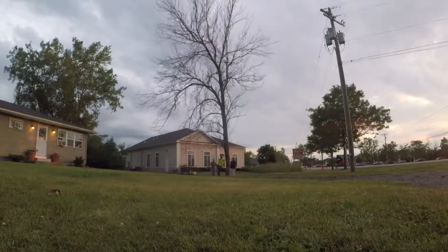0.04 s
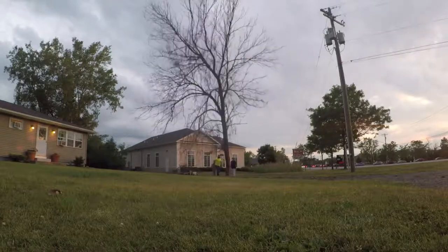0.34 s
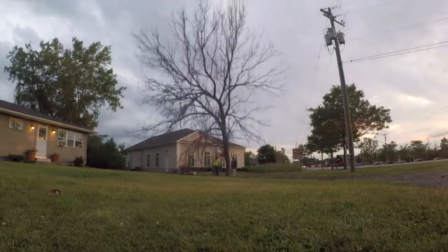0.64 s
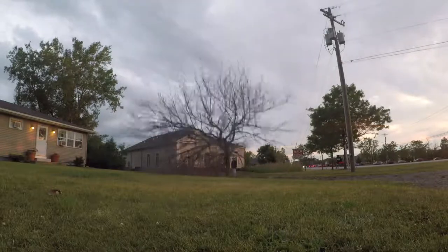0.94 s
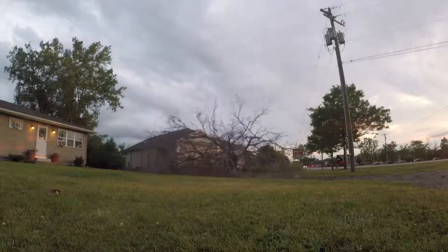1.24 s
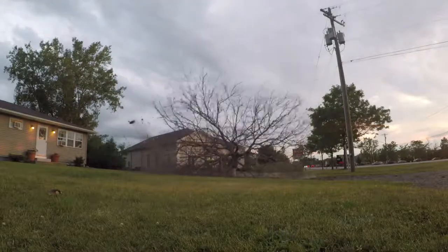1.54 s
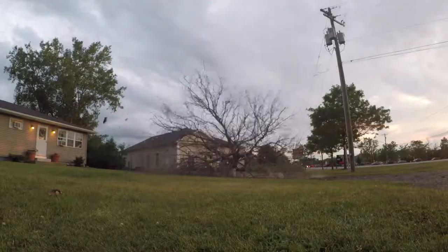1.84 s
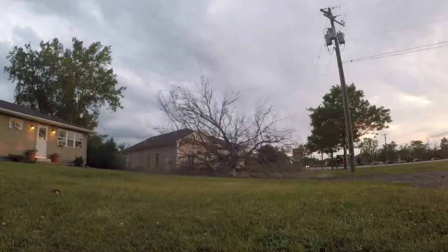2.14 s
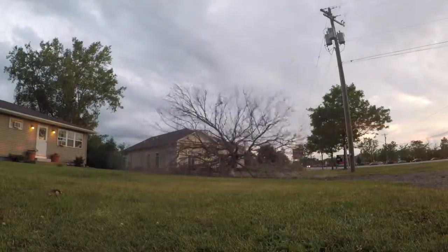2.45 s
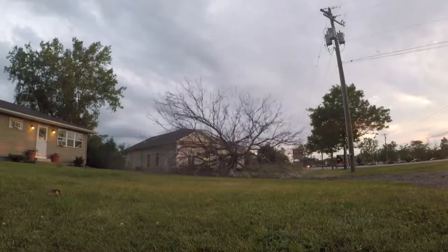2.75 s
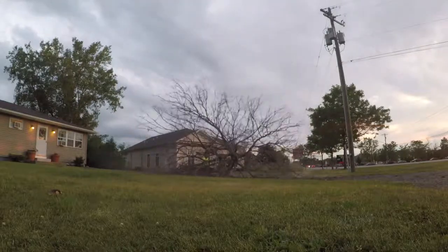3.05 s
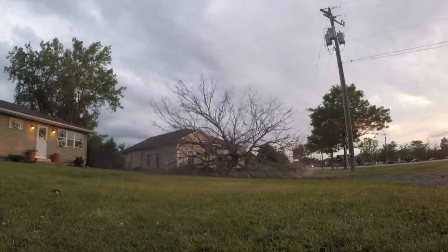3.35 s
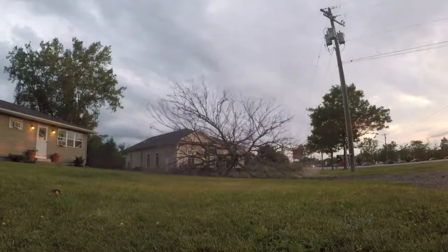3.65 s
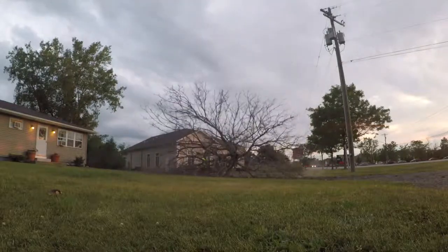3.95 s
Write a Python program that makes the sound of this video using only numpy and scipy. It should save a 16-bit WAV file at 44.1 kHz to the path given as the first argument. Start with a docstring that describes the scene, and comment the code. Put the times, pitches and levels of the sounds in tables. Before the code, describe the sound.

A tree falls some way off, starting with a dull rush and two hollow wooden knocks around 0.5 seconds. Snapping twigs and branches swell into a crash, limbs thudding from 0.8 and the trunk landing at about 1 second. The tree rocks and settles with another rush after 2 seconds, then thinning snaps and debris ticks until 4. A low engine drone and rumble run beneath, strongest before the landing.

```python
"""A bare tree is felled across a lawn, some way off, its crown landing in a rush of breaking twigs.
Branches snap in quick runs of fractures, thick wood knocks, limbs and trunk thud onto the turf.
The tree rocks and settles with a dull rush and scattered snaps; debris ticks nearby.
An engine drones and rumbles beneath. Two closely spaced microphone ports in the grass hear it all."""
import sys
import numpy as np
from scipy import signal
from scipy.fft import rfft, irfft
from scipy.io import wavfile

SR = 44100
rng = np.random.default_rng(int(sys.argv[2]) if len(sys.argv) > 2 else 0)


def master_out(mix):
    """Clip the mix to full scale and print it as 16-bit PCM to the path in sys.argv[1]."""
    frames = np.transpose(np.atleast_2d(mix))
    ceiling = np.clip(frames, -1, 1)
    pcm = np.round(ceiling * 32767).astype(np.int16)
    wavfile.write(sys.argv[1], SR, pcm)


N = 176400
T = np.arange(N) / SR
HZ = np.maximum(np.arange(N + 1) * SR / (2 * N), 1)

# how hard the twigs are crushed (time [s], level [dB])
CRUSH_LEVEL = [(0, -48.5), (.48, -45.5), (.565, -41.5), (.585, -34), (.69, -27.5), (.82, -24.5),
               (1.02, -24), (1.035, -31), (1.09, -28.5), (1.118, -23.5), (1.145, -27), (1.25, -29),
               (1.42, -33.5), (1.99, -36), (2.025, -30.5), (2.35, -35), (2.82, -40), (2.9, -36.5),
               (3.05, -35.5), (3.1, -42), (3.3, -47), (4, -47.5)]
# twig spectrum in the crash (frequency [Hz], gain [dB])
CRASH_EQ = [(300, 11), (900, -7), (1400, -6), (2100, 1.5), (2900, -1), (4000, 1.5), (5500, 2), (7800, -8),
            (10000, -12.5), (14000, -26.5)]
# twig spectrum while settling (frequency [Hz], gain [dB])
SETTLE_EQ = [(300, 9), (900, -5), (1400, -5.5), (2100, 1), (2900, -3.5), (4000, -1.5), (5800, -1.5),
             (7800, -11.5), (10000, -13.5), (14000, -32.5)]
# branch snaps (time [s], relative peak [dB], pitch [Hz])
SNAPS = [(.516, -22.5, 4490), (.573, -20, 4700), (0.633, -12, 4480), (0.661, -13.5, 4270),
         (.691, -12, 4850), (0.719, -10, 4880), (.737, -23, 5000), (.773, -15, 4600), (.798, -6.5, 4630),
         (0.825, -7.5, 5360), (0.859, -10.5, 4400), (.896, -10, 3360), (.94, -13, 4700), (.951, -14, 3240),
         (.973, -12, 4000), (0.993, -20, 4000), (1.024, -17, 3600), (1.108, -16, 3380),
         (1.123, -11.5, 3980), (1.166, -9.5, 4680), (1.186, -17.5, 3930), (1.247, -12, 4600),
         (1.485, -15, 5050), (1.738, -18, 8600), (1.781, -24.5, 2760), (1.834, -24, 9500),
         (2.027, -17.5, 2360), (2.088, -15, 5870), (2.207, -19, 9400), (2.21, -7.5, 4510),
         (2.252, -16, 5430), (2.413, -18.5, 6200), (2.439, -18, 4000), (2.611, -21, 4700),
         (2.622, -18, 2700), (2.718, -18.5, 2160), (2.741, -19.5, 5080), (2.754, -25, 10500),
         (3.171, -21.5, 3320), (3.195, -23, 3560), (3.456, -29, 2300), (3.48, -22.5, 2500),
         (3.556, -29, 2780), (3.642, -23.5, 3900), (3.712, -19.5, 4370), (3.881, -24.5, 3530),
         (3.939, -18.5, 4100), (3.98, -28, 4180)]
# hollow knocks of thick wood (time [s], level [dB], pitch [Hz])
KNOCKS = [(.392, -16.5, 292), (.522, -14, 364.6), (1.471, -21.5, 460)]
# debris ticks (time [s], relative level [dB])
TICKS = [(.04, -28.5), (.158, -30.5), (.174, -30.5), (.283, -30), (.39, -31), (1.724, -26), (1.736, -28),
         (2.166, -28), (2.754, -26), (2.87, -24), (3.049, -29), (3.241, -29), (3.637, -30), (3.835, -27)]
# tick spectrum (frequency [Hz], gain [dB])
TICK_EQ = [(800, 4), (2500, 17), (6000, 17), (12000, 1), (15000, -17)]
# limb landings (time [s], relative level [dB])
LIMB_HITS = [(.80, -18), (.845, -11), (.918, -11), (.985, -13), (1.06, -17.5), (1.105, -20.5), (1.147, -17),
             (1.49, -19)]
# limb thud spectrum (frequency [Hz], gain [dB])
LIMB_EQ = [(25, -22), (75, -9), (140, 1.5), (300, -6), (600, -11), (1000, -30.5), (2500, -55)]
# trunk landing (time [s], level [dB])
TRUNK_HIT = [(1.021, -11)]
# trunk slam spectrum (frequency [Hz], gain [dB])
TRUNK_EQ = [(120, -18), (280, 6.5), (600, 2.5), (1100, -8.5), (2200, -7.5), (5000, -14), (10000, -52)]
# rush of the moving tree (time [s], level [dB])
RUSH_LEVEL = [(0, -24), (.17, -25), (.42, -30), (.62, -26.5), (.85, -23), (1.02, -32), (1.25, -30),
              (1.5, -32.5), (1.85, -32.5), (2.1, -27.5), (2.8, -32.5), (3.3, -42), (4, -35.5)]
# rush, lower band (frequency [Hz], gain [dB])
RUSH_LOW_EQ = [(150, -22.5), (260, -2), (380, -3.5), (540, -3), (720, -14.5), (1100, -29), (3000, -71)]
# rush, upper band (frequency [Hz], gain [dB])
RUSH_TOP_EQ = [(350, -20.5), (650, 7.5), (800, -4), (1100, -12.5), (1600, -43), (4000, -61)]
# engine note (time [s], pitch [Hz], relative level [dB])
ENGINE_NOTE = [(0, 56.6, -18.5), (.35, 55.45, -18.5), (.6, 55.3, -14.5), (.8, 53.75, -19), (.9, 54.9, -20),
               (1.25, 54, -44), (2.6, 57.14, -31), (4, 56.8, -29.5)]
# engine harmonics (order [-], gain [dB])
ENGINE_ORDERS = [(1, 2), (2, -9), (3, -14.5)]
# background rumble (time [s], level [dB])
RUMBLE_LEVEL = [(0, -18.5), (.7, -18), (1, -15.5), (1.25, -24.5), (1.6, -23), (1.95, -22.5), (2.25, -18.5),
                (2.8, -17), (3.4, -17.5), (4, -18)]
# rumble and hiss spectrum (frequency [Hz], gain [dB])
RUMBLE_EQ = [(15, -6.5), (32, -2.5), (65, 3), (85, -3.5), (108, -0.5), (150, -6), (220, -10.5),
             (330, -14.5), (450, -18.5), (620, -21), (900, -30), (1500, -37), (3000, -49.5), (5500, -52),
             (8000, -66), (11000, -72), (15000, -84)]
# left port against right (frequency [Hz], level [dB], phase lead [rad], coherence [0-1])
PORT_RESPONSE = [(100, -2.4, -.02, 1), (250, -4, -.15, .999), (400, -8, -.35, .99), (510, -14, -.4, .97),
                 (600, -24, .5, .5), (660, -17, 2.5, .93), (800, -7.8, 2.45, .98), (1050, -4.5, 2.35, .97),
                 (1550, -5.5, 1.7, .83), (2350, 1.5, 0, .86), (2900, -3.5, -.4, .82), (3500, -.5, .1, .96),
                 (4800, 1.8, .2, .88), (5600, -2, .1, .5), (6700, .5, 1.8, .5), (7900, 7, 1.8, .45),
                 (9500, -.5, .3, .25), (14000, 0, 0, .25)]


def twigs(ref_per_s=1250, ref_db=-24.5, tail_t60_s=0.072, tail_db=2.5, rustle_db=-5.5):
    """Twigs break in bunches over a smooth rustle; harder crushing is louder and denser."""
    crush_db, = in_time(CRUSH_LEVEL)
    breaks_per_s = ref_per_s * from_db(0.24 * (crush_db - ref_db))
    chance = breaks_per_s / SR
    size_db = 4 * np.minimum(rng.exponential(1, N), 3)
    sizes = rms_one(from_db(size_db)) * rng.choice([-1, 1], N)
    bunches = rms_one(from_db(0.5 * drift(per_s=25)))
    onsets = np.flatnonzero(rng.random(N) < chance)
    pitch_hz = rng.uniform(1000, 16000, N)
    strength = bunches * sizes / np.sqrt(chance)
    grit, crackle = noise(), np.zeros((2, N))
    for i in onsets:
        twig = fracture(pitch_hz[i], grit[:, i % (N - 1024):], t60_cycles=28, grit_gain=0.6)
        add(crackle, i / SR, strength[i] * twig)
    # each break also bounces through the crown
    power_decay = from_db(-120 / (tail_t60_s * SR))
    tail_power = signal.lfilter([1 - power_decay], [1, -power_decay], crackle ** 2 + 1e-18)
    tail = from_db(tail_db) * noise() * np.sqrt(tail_power)
    flat = from_db(crush_db) * (crackle + tail + from_db(rustle_db) * noise())
    settled = np.interp(T, [1.4, 1.44], [0, 1])
    return (1 - settled) * coloured(flat, CRASH_EQ) + settled * coloured(flat, SETTLE_EQ)


def fracture(hz, grit, t60_cycles, grit_gain):
    """One break in wood: a short ring plus a noisy crack, unit energy."""
    t = T[:512]
    ring = np.sin(2 * np.pi * hz * t * [[1], [1.1]])
    crack = (ring + grit_gain * grit[:, :len(t)]) * from_db(-60 * t * hz / t60_cycles)
    return crack / np.sqrt(np.sum(crack ** 2, axis=1, keepdims=True))


def snaps(gain_db=2.5, step_db=3.5, gap_cycles=4.25, log_pitch_spread=0.26):
    """A branch gives way in six fractures, the third strongest; thicker ones are slower and duller."""
    out = np.zeros((2, N))
    for time_s, db, hz in SNAPS:
        lowpass = signal.butter(2, min(1.38 * hz, SR / 2.5), fs=SR, output="sos")
        for k in range(-2, 4):
            pitch_hz = hz * np.exp(log_pitch_spread * (k != 0) * rng.uniform(-1, 1))
            crack = fracture(pitch_hz, rng.standard_normal((2, 512)), t60_cycles=11, grit_gain=0.62)
            crack = signal.sosfilt(lowpass, crack)
            lag_s = gap_cycles / hz * (k + rng.uniform(-0.5, 0.5))
            peak = from_db(db + gain_db - step_db * abs(k))
            add(out, time_s + lag_s, peak * crack / np.abs(crack).max())
    return out


def knocks(t60_s=0.12):
    """A strained trunk or struck limb rings briefly in two low modes."""
    out, t = np.zeros((2, N)), T[:SR // 4]
    for time_s, db, hz in KNOCKS:
        ring = np.sin(2 * np.pi * hz * t) + 0.2 * np.sin(2 * np.pi * 1.2 * hz * t)
        add(out, time_s, (ring * from_db(db - 60 * t / t60_s))[None])
    return out


def thuds(limb_gain_db=-5):
    """Heavy limbs land on the turf; the trunk slams down with a broad woody crack."""
    limbs = from_db(limb_gain_db) * coloured(bursts(LIMB_HITS, t60_s=0.39), LIMB_EQ)
    trunk = coloured(bursts(TRUNK_HIT, t60_s=0.057), TRUNK_EQ)
    return limbs + trunk


def rush(ref_db=-27, top_at_ref_db=-34.5, top_db_per_db=2.22):
    """Hollow rush as the trunk tips, lands and rocks back; brighter as it swells."""
    low_db, = in_time(RUSH_LEVEL)
    top_db = top_at_ref_db + top_db_per_db * (low_db - ref_db)
    low = from_db(low_db) * coloured(noise(), RUSH_LOW_EQ)
    top = from_db(top_db) * coloured(noise(), RUSH_TOP_EQ)
    return low + top


def ticks(gain_db=-2.5):
    """Bits of debris tick brightly near the microphone."""
    return from_db(gain_db) * coloured(bursts(TICKS, t60_s=0.026), TICK_EQ)


def engine(waver_hz=0.7, waver_db=1.3):
    """Wavering drone of three harmonics, loudest until the tree lands."""
    hz, db = in_time(ENGINE_NOTE)
    phase = 2 * np.pi * np.cumsum(hz + waver_hz * drift(per_s=12)) / SR
    out = np.zeros(N)
    for order, order_db in ENGINE_ORDERS:
        rms = from_db(db + order_db + waver_db * drift(per_s=6.6))
        out += np.sqrt(2) * rms * np.sin(order * phase)
    return out


def rumble():
    """Low outdoor rumble with a faint hiss."""
    db, = in_time(RUMBLE_LEVEL)
    return from_db(db) * coloured(noise(), RUMBLE_EQ)


def ports(x):
    """Two ports hear one sound at different level and phase; the left has a deep notch."""
    direct, scattered = rfft(x, 2 * N)
    db, lead_rad, coherence = in_hz(PORT_RESPONSE)
    coherence = np.clip(coherence, 0, 1)
    left_gain = from_db(db) * np.exp(1j * lead_rad)
    left = left_gain * (coherence * direct + np.sqrt(1 - coherence ** 2) * scattered)
    mid_gain = np.sqrt(1 + np.abs(left_gain) ** 2 + 2 * coherence * left_gain.real) / 2
    return irfft(np.array([left, direct]) / mid_gain)[:, :N]


def from_db(db):
    """Decibels to gain."""
    return 10 ** (np.asarray(db) / 20)


def rms_one(x):
    """Scale to unit power."""
    return x / np.sqrt(np.mean(x ** 2) + 1e-20)


def in_time(rows):
    """Each column of a curve at every sample."""
    time_s, *columns = np.transpose(rows)
    return [np.interp(T, time_s, c) for c in columns]


def in_hz(rows):
    """Each column of a spectrum at every frequency."""
    hz, *columns = np.transpose(rows)
    return [np.interp(np.log(HZ), np.log(hz), c) for c in columns]


def coloured(x, eq):
    """Shape a flat spectrum, keeping its power."""
    db, = in_hz(eq)
    return irfft(rfft(x, 2 * N) * rms_one(from_db(db)))[:, :N]


def noise():
    """Two independent white noises: direct and scattered."""
    return rng.standard_normal((2, N))


def bursts(hits, t60_s):
    """Noise that jumps at each hit and decays."""
    envelope = sum((T >= s) * from_db(db - 60 * np.maximum(T - s, 0) / t60_s) for s, db in hits)
    return noise() * envelope


def drift(per_s):
    """Slow wander between unit-variance random points."""
    return np.interp(T * per_s, np.arange(400), rng.standard_normal(400))


def add(out, time_s, sound):
    """Mix in a short sound."""
    i = max(int(time_s * SR), 0)
    out[:, i:i + sound.shape[1]] += sound[:, :max(N - i, 0)]


def scene():
    """Falling tree and background at the two ports."""
    tree = twigs() + snaps() + knocks() + ticks() + thuds() + rush()
    return ports(tree + engine() + rumble())


def record(dry):
    """Soft clip, then a steep low-pass."""
    stop_db, stop_hz = 70, 15400
    lowpass = signal.cheby2(16, stop_db, stop_hz, fs=SR, output="sos")
    rounded = dry / (1 + dry ** 6) ** (1 / 6)
    return signal.sosfilt(lowpass, rounded)


dry = scene()
out = record(dry)
master_out(out)
```